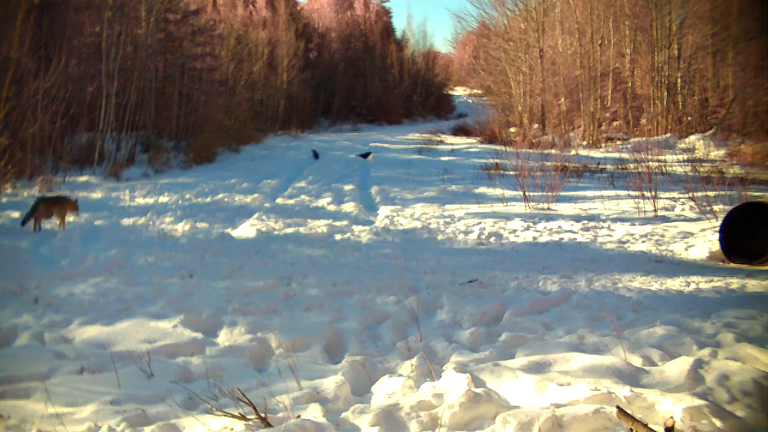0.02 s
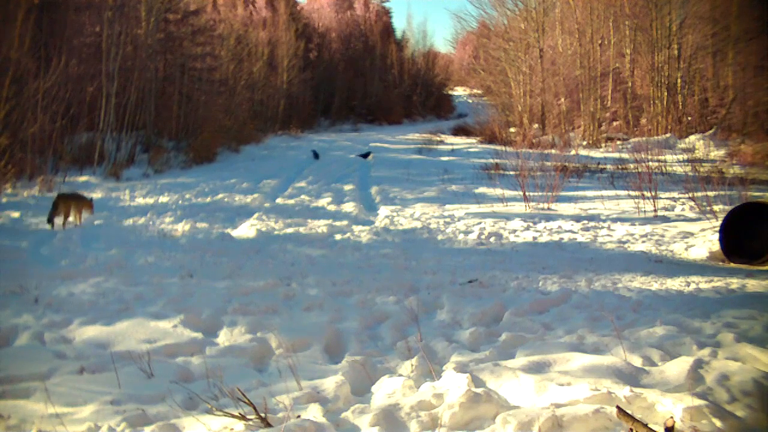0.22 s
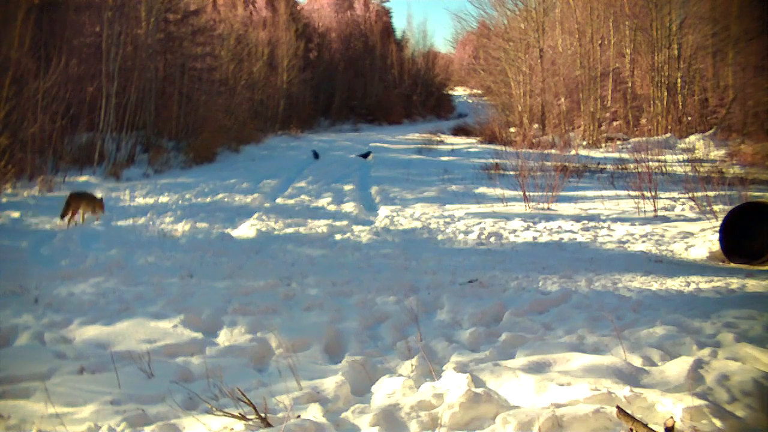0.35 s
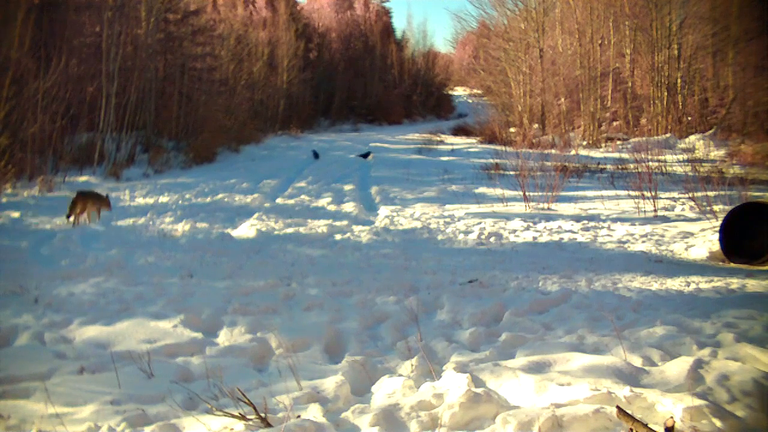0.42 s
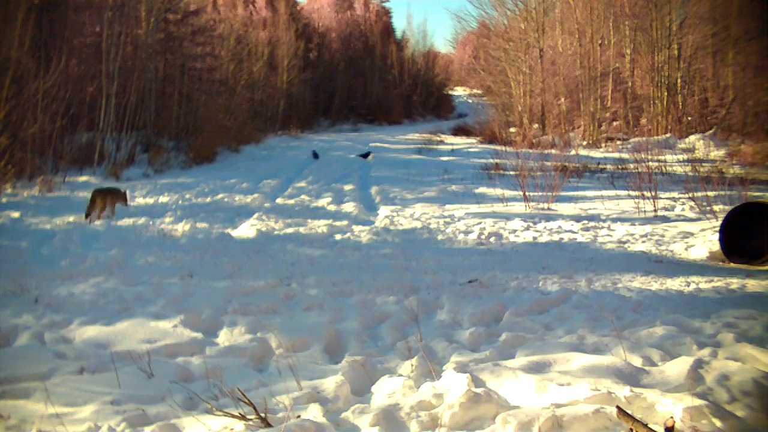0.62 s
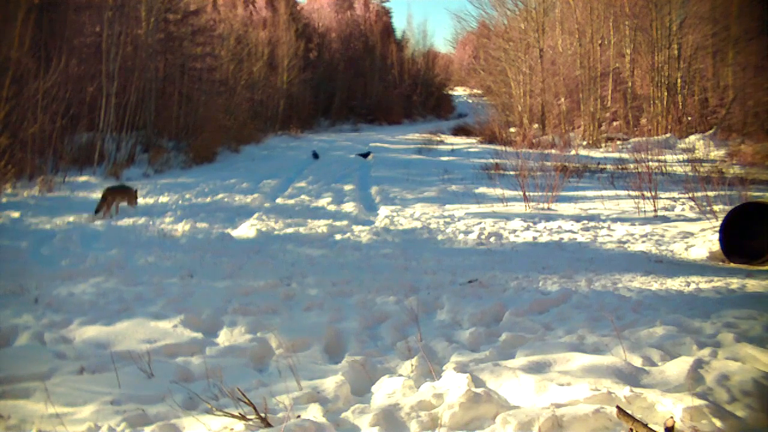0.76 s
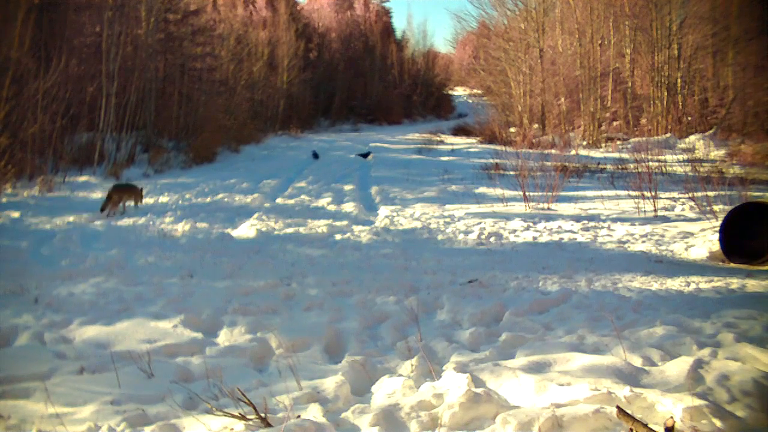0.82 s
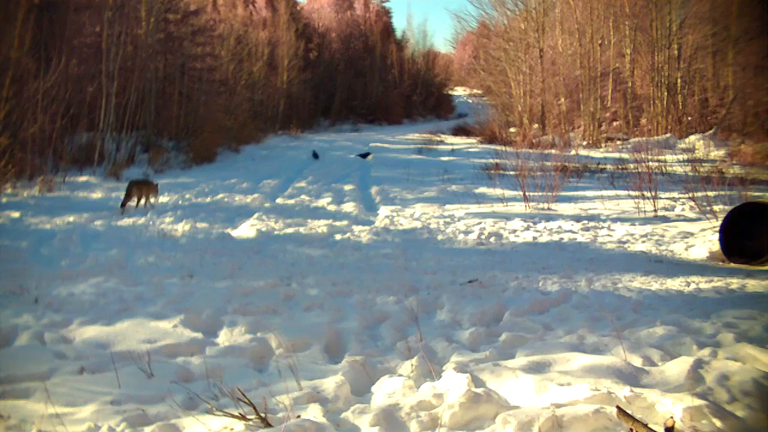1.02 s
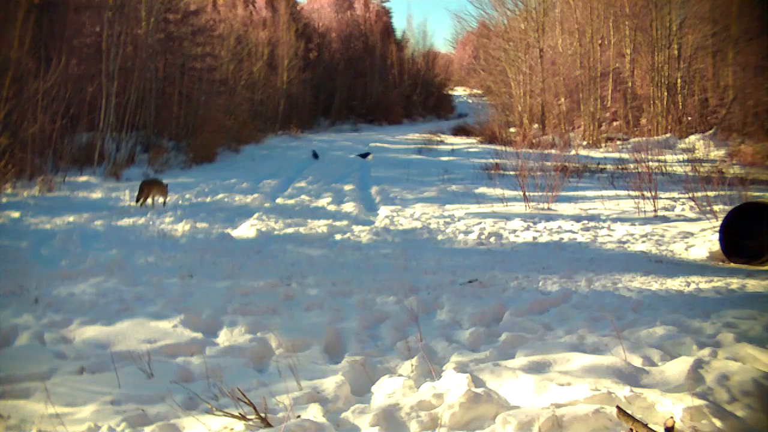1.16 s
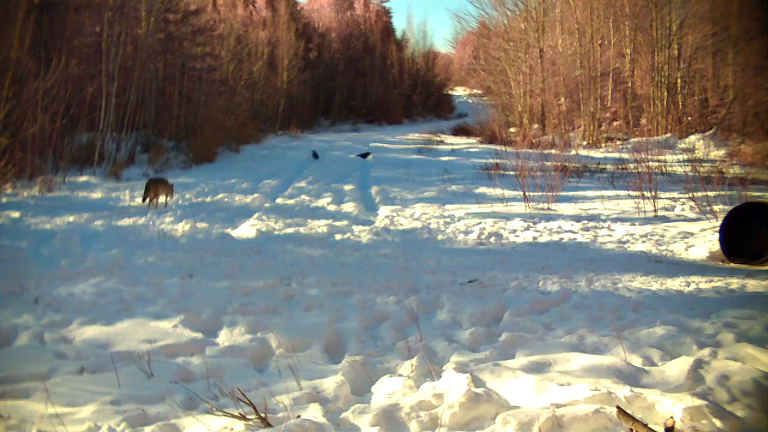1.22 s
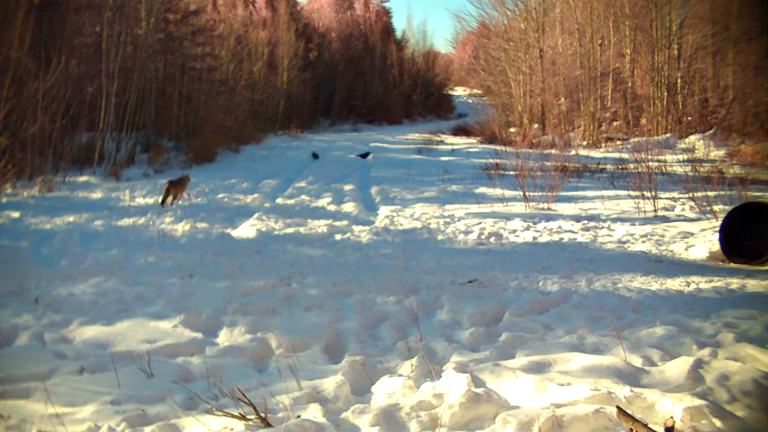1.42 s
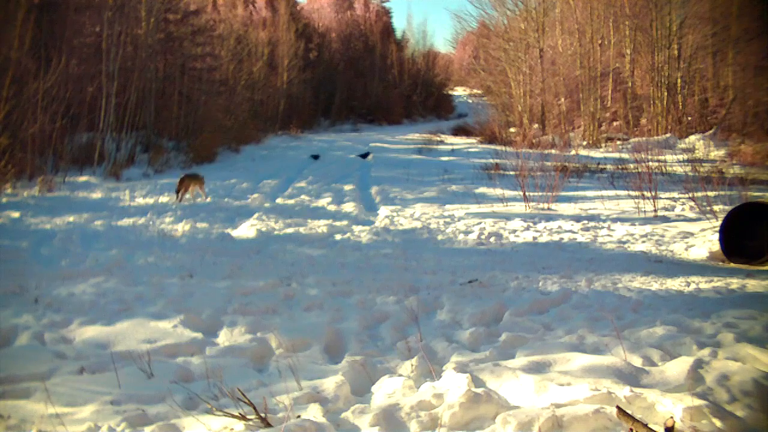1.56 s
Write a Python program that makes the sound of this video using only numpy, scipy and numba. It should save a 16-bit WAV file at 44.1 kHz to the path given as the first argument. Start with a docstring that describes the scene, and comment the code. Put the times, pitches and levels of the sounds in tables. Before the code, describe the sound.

A raven gives a harsh, rattling caw from about 0.2 to 0.45 seconds, then a slightly softer, longer one from 0.8 to 1.15 seconds. Each echoes through the surrounding trees, fading in under a second. A small, high tick comes at about 1.5 seconds. Faint microphone hiss, a low buzz and a thin whine run throughout, dipping under the caws.

```python
"""Raven over a snowy clearing

A raven gives two harsh caws, each a slowing rattle of sharp pulses through the throat, scattered
by the trunks into a long wash. A small tick follows. The camera adds hiss, a faint whine and a
frame-rate buzz, and its gain control ducks them all under the caws."""
import sys
import numpy as np
from scipy import signal
from scipy.fft import rfft, irfft
from scipy.io import wavfile
from scipy.ndimage import uniform_filter1d
from numba import njit

SR = 44100
rng = np.random.default_rng(int(sys.argv[2]) if len(sys.argv) > 2 else 0)


def generate_wav(signal):
    """Clip the signal to [-1, 1] and save it as 16-bit WAV at the path in sys.argv[1]."""
    frames = np.transpose(np.atleast_2d(signal))
    scaled = np.clip(frames, -1, 1) * 32767
    pcm = np.round(scaled).astype(np.int16)
    wavfile.write(sys.argv[1], SR, pcm)


N = 70560


def undb(db):
    """Decibels to gain."""
    return 10 ** (np.asarray(db) / 20)


def lookup(points, hz):
    """Interpolate (hz, value) points on a log-frequency axis."""
    freqs_hz, values = np.array(points, float).T
    return np.interp(np.log(np.maximum(hz, 1)), np.log(freqs_hz), values)


def convolve(x, response):
    """Pass a sound through an impulse response."""
    return signal.fftconvolve(x, response)[:N]


def colour(x, curve_db, size=2048):
    """Minimum-phase filter with gain curve_db(hz)."""
    cepstrum = irfft(np.log(undb(curve_db(np.fft.rfftfreq(size, 1 / SR)))))
    cepstrum[1:size // 2] *= 2
    cepstrum[size // 2 + 1:] = 0
    return convolve(x, irfft(np.exp(rfft(cepstrum))))


def drift(rate_hz):
    """Smooth random drift, spread near 1."""
    hold = int(SR / rate_hz)
    return uniform_filter1d(np.repeat(rng.standard_normal(N // hold + 1), hold), hold)[:N]


def add(track, at_s, sound):
    """Mix a sound in at the given time."""
    part = track[int(at_s * SR):][:len(sound)]
    part += sound[:len(part)]


@njit
def follow(x, attack_s, release_s):
    """One-pole follower with separate rise and fall times."""
    out, level = np.empty(len(x)), 0.
    for i in range(len(x)):
        level += (x[i] - level) / (SR * (attack_s if x[i] > level else release_s))
        out[i] = level
    return out


# Hiss spectrum: freq_hz, relative_db
HISS_SPECTRUM = [(200, 5), (600, 10), (1300, -2), (2000, -2.5), (3700, -3), (4500, -0.5), (5400, -5),
                 (7000, -5), (10000, -9.5), (13000, -14.5), (15000, -24)]


def camera_hiss(rms_db=-56):
    """Steady noise of the electronics."""
    hiss = colour(rng.standard_normal(N), lambda hz: lookup(HISS_SPECTRUM, hz))
    return undb(rms_db) * hiss / hiss.std()


def camera_buzz(t, frame_hz=29.97, offset_s=.0265, duty=.44, sag_hz=16.3, edge_hz=2800, gain_db=-38.5):
    """A sagging square wave, one cycle a frame, with a wobbling duty cycle."""
    frames = (t - offset_s) * frame_hz
    square = (frames % 1 < duty + .044 * drift(30)) - .5
    sagging = signal.sosfilt(signal.butter(2, sag_hz, "high", fs=SR, output="sos"), square)
    return undb(gain_db) * signal.sosfilt(signal.butter(1, edge_hz, fs=SR, output="sos"), sagging)


def camera_whine(t, whine_hz=7770, whine_db=-71, flicker_db=6, tone_hz=11900, tone_db=-86):
    """A flickering electronic whine and a thin, steady tone above it."""
    pitch_hz = whine_hz + 90 * drift(600)
    level_db = whine_db + flicker_db * drift(25.03)
    whine = undb(level_db) * np.sin(2 * np.pi * np.cumsum(pitch_hz) / SR)
    return whine + undb(tone_db) * np.sin(2 * np.pi * tone_hz * t)


# Decay of the wash: freq_hz, t60_s
WASH_DECAY = [(700, 1), (1100, 1.0), (1600, 0.8044), (2700, 1.0), (4300, 0.83), (5200, 0.5741)]
# Colour of the wash: freq_hz, gain_db
WASH_COLOUR = [(750, -7), (1100, -1), (1600, 1.5), (2000, -1), (2700, -1.5), (4500, 1.5), (5200, -3),
               (6200, 3.5)]


def woods(t, trunks_per_s=2500, spread_db=3, build_s=.056, wash_db=-6, near_decay_s=.039, near_db=-2):
    """Impulse response of many trunks: a near scatter, then a long wash whose top dies first."""
    arrivals = rng.random(N) < trunks_per_s / SR
    echoes = arrivals * rng.standard_normal(N) * undb(spread_db * rng.standard_normal(N))
    spectrum, hz = rfft(echoes, 2 * N), np.fft.rfftfreq(2 * N, 1 / SR)
    centres_hz, t60s_s = np.array(WASH_DECAY).T
    wash = np.zeros(N)
    for weights, t60_s in zip(np.eye(len(centres_hz)), t60s_s):
        band = irfft(spectrum * np.interp(hz, centres_hz, weights))[:N]
        wash += band * undb(-60 * t / t60_s)
    wash *= 1 - np.exp(-t / build_s)
    wash = colour(wash / np.linalg.norm(wash), lambda hz: lookup(WASH_COLOUR, hz))
    near = rng.standard_normal(N) * np.exp(-t / near_decay_s) * (t > .0015)
    return undb(wash_db) * wash + undb(near_db) * near / np.linalg.norm(near)


# Tick resonances: freq_hz, gain_db
TICK_RESPONSE = [(1500, -44.5), (2700, -8), (3150, 8), (3650, -21), (4400, 8.5), (5000, -25), (6000, -50),
                 (9000, -60)]


def tick(t, start_s=1.5425, decay_s=.0043, gain_db=-24):
    """One small, high tick: a noise burst through two resonances."""
    burst = rng.standard_normal(N) * (t > start_s) * np.exp(-np.abs(t - start_s) / decay_s)
    return undb(gain_db) * colour(burst, lambda hz: lookup(TICK_RESPONSE, hz))


SPLIT_S = .002
PREROLL_S = 2 * SPLIT_S


def syrinx_pulse(ragged, split_db=-3, rasp_db=.5, size=1024):
    """One snap of the syrinx; a ragged one splits in three and carries a rasp."""
    t = np.arange(size) / SR
    click = lambda at_s: np.sinc((t - PREROLL_S - at_s) * SR)
    lead_s, lag_s = SPLIT_S * np.exp(rng.normal(0, (.2603, .4)))
    split = click(-lead_s) + click(lag_s)
    rasp_decay_s = .013 * (ragged + .12)
    rasp = rng.standard_normal(size) * np.exp(-t / rasp_decay_s) * (t > SPLIT_S)
    rough = undb(split_db) * split + undb(rasp_db) * rasp / np.linalg.norm(rasp)
    return (1 - .5 * ragged) * click(0) + ragged * rough


# Throat resonances: freq_hz, gain_db
THROAT_RESPONSE = [(400, -58.5), (660, -48.5), (800, -11.5), (930, 4.5), (1110, 4), (1330, -6), (1650, -6),
                   (1900, -20), (2120, -14.5), (2380, -0.5), (2800, -2.5), (3100, -3), (3500, -2.5),
                   (3900, -1.5), (4450, 4.5), (4800, -4.5), (5200, -12.5), (5450, -22), (5700, -36),
                   (6500, -39.5), (8000, -68.5), (11000, -98.5)]
BASS_FADE_OUT_HZ, TREBLE_FADE_IN_HZ = (1670, 2260), (2930, 4430)
SECOND_RESONANCE_HZ, SECOND_WIDTH_HZ = 1605, 320


def throat(pulse, bass_db, treble_db, low_shift_pct, second_db):
    """Filter a pulse through the throat at one opening of the beak."""
    def response_db(hz):
        bass = np.interp(hz, BASS_FADE_OUT_HZ, (1, 0))
        treble = np.interp(hz, TREBLE_FADE_IN_HZ, (0, 1))
        second = np.exp(-((hz - SECOND_RESONANCE_HZ) / SECOND_WIDTH_HZ) ** 2)
        shifted_db = lookup(THROAT_RESPONSE, hz / (1 + bass * low_shift_pct / 100))
        return shifted_db + bass * bass_db + treble * treble_db + second * second_db
    return colour(pulse, response_db)


# Breakpoints, one list per caw:
# time_s, pulse_rate_hz, relative_db, bass_db, treble_db, low_resonance_shift_pct, second_resonance_db
CAW_CONTOURS = [
    [(.2088, 123, -23, 0.5, -3, -6, -12.5), (.2163, 93, -16.5, 3, -2.5, 5, -16.5),
     (.238, 82.6, -8.5, -1, 2.5, -6.5, -11), (.251, 79, -3, -0.5, -0.5, 0, -7.5),
     (.277, 73, -7, 0.5, -2, 3.5, -6), (.29, 76.5, -1, -3.5, -4.5, 5.5, -11),
     (.3175, 72.5, -4.5, 1.5, 0, 6, -4.5), (.38, 53.7, -2, -1, -1, 9.5, 3.5), (.398, 48, -2, 1, 0, 8.5, -1),
     (.45, 50, -11, 4, -2.5, 9, 2)],
    [(.7828, 100, -22, 0.5, -17, -7.5, 2), (.7928, 83.4, -16, 4, -13.5, -4, 0.5),
     (.817, 79, -9.5, 2.5, -8.5, -8, -1), (.843, 77.6, -10, -2.5, -3.5, 3.5, 6),
     (.87, 64, -9.5, 0.5, -0.5, 0.5, 5), (.917, 62, -10.5, 6.5, -3, 5.5, 4.5),
     (.97, 53.2, -7.5, 1, -2, 5.5, 3), (1.03, 44.6, -9.5, -1.5, -1, 2, -0.5),
     (1.07, 65.4, -16.5, -5, 6.5, -0.5, 0), (1.145, 61.6, -20.5, -2.5, 5.5, -4, -12)],
]


def caw(contour, gain_db=24.5, scatter_db=.44, roughen_s=(.042, .17), max_pulses=32):
    """A rattle of pulses that starts nearly clean, then slows and turns ragged."""
    times_s, *columns = np.array(contour).T
    out, at_s = np.zeros(N), times_s[0]
    for jitter_db in rng.normal(0, scatter_db, max_pulses):
        rate_hz, relative_db, *beak = (np.interp(at_s, times_s, column) for column in columns)
        ragged = np.interp(at_s - times_s[0], roughen_s, (.24, .85))
        snap = throat(syrinx_pulse(ragged), *beak)
        if at_s < times_s[-1]:
            add(out, at_s - PREROLL_S, undb(relative_db + jitter_db) * snap)
        at_s += 1 / rate_hz
    return undb(gain_db) * out


def scene(caw_sends_db=(-3, 1.5)):
    """Raven and tick, direct and through the woods, over the camera's own noise."""
    t = np.arange(N) / SR
    caws = [caw(contour) for contour in CAW_CONTOURS]
    small_tick = tick(t)
    into_woods = sum(undb(db) * call for db, call in zip(caw_sends_db, caws)) + small_tick
    echoes = convolve(into_woods, woods(t))
    electronics = camera_buzz(t) + camera_whine(t) + camera_hiss()
    return (electronics + echoes + small_tick + sum(caws))[None]


def gain_control(x, threshold_db=-25, ratio=7, attack_s=.019, release_s=.013, lag_s=.002):
    """Turn everything down, a moment late, while the sound is above the threshold."""
    power = follow(x ** 2, attack_s, release_s)
    over_db = np.maximum(10 * np.log10(power + 1e-12) - threshold_db, 0)
    return x * undb((1 / ratio - 1) * follow(over_db, lag_s, lag_s))


def record(dry, cutoff_hz=15200):
    """Gain control, then a steep low-pass."""
    lowpass = signal.ellip(8, .2, 70, cutoff_hz, fs=SR, output="sos")
    return signal.sosfilt(lowpass, gain_control(dry[0]))[None]


dry = scene()
out = record(dry)
generate_wav(out)
```